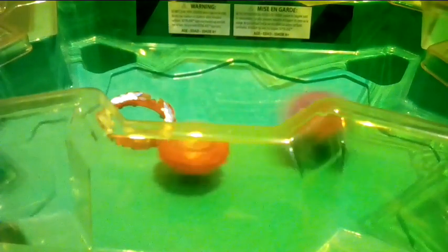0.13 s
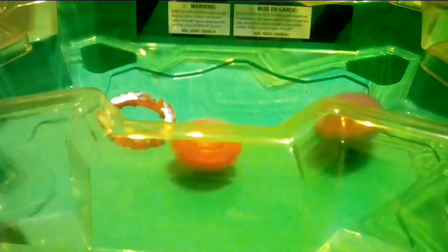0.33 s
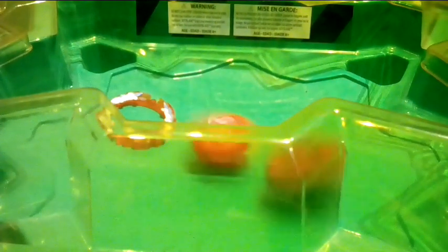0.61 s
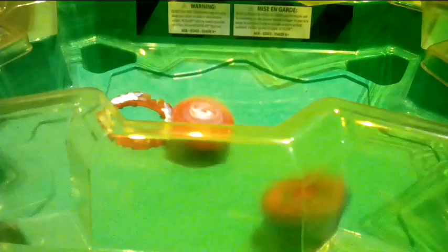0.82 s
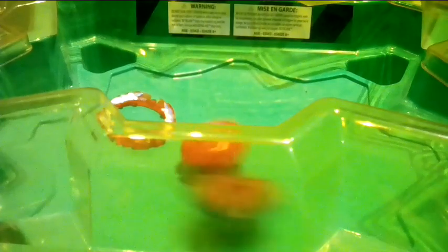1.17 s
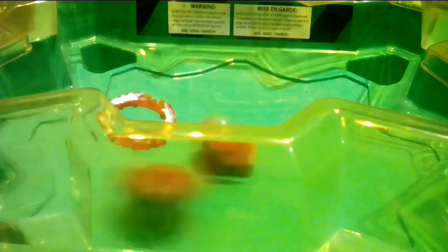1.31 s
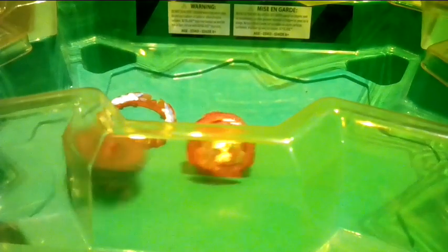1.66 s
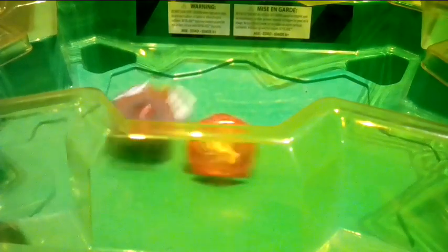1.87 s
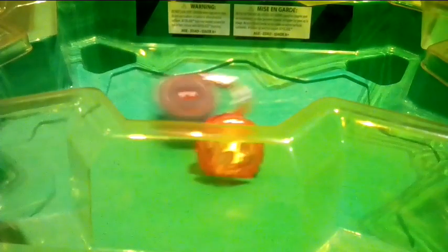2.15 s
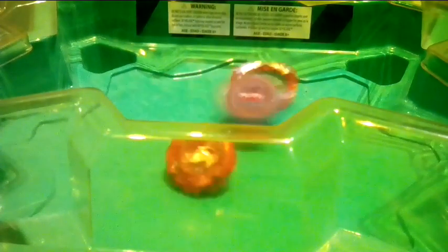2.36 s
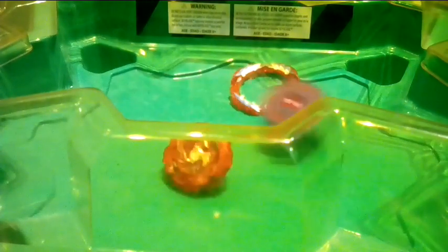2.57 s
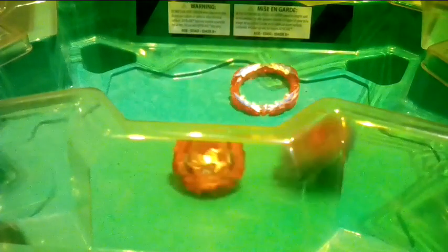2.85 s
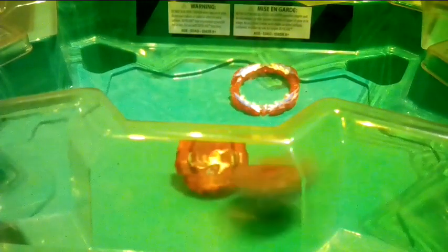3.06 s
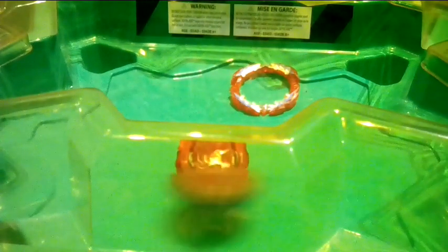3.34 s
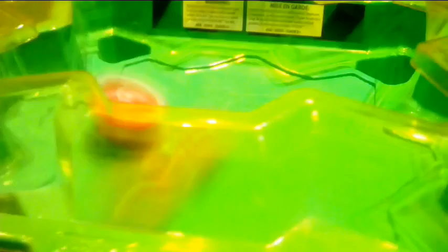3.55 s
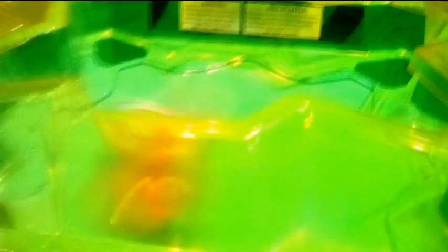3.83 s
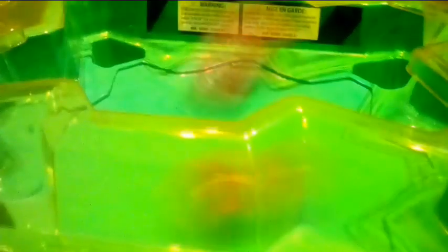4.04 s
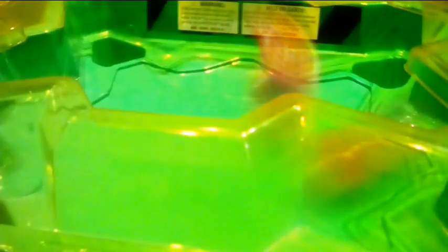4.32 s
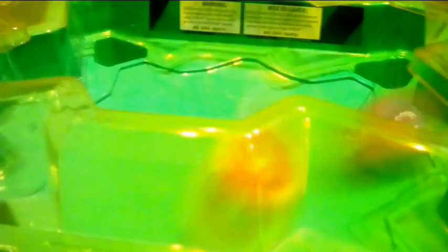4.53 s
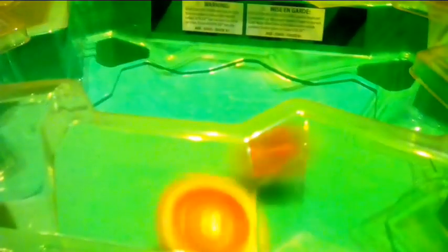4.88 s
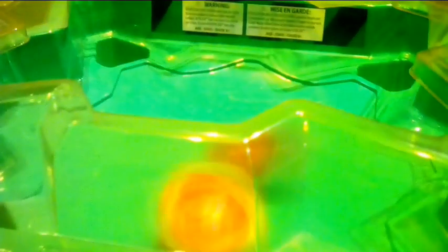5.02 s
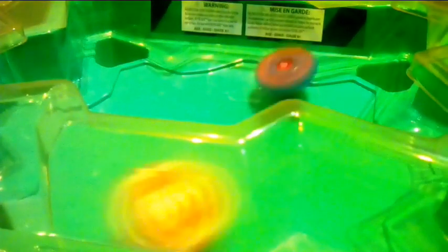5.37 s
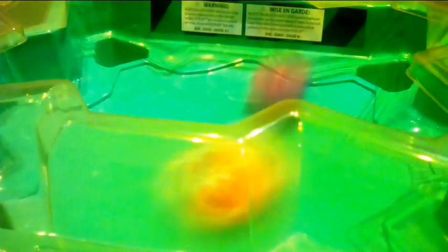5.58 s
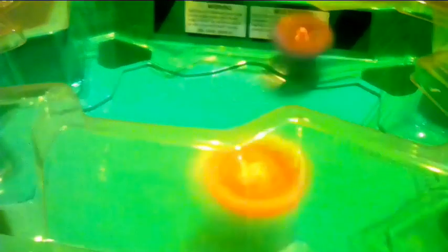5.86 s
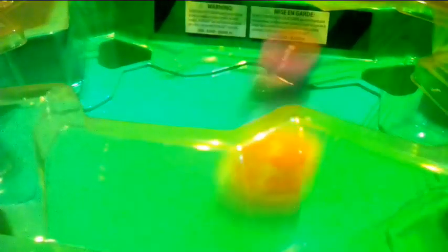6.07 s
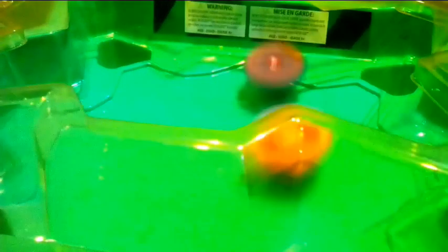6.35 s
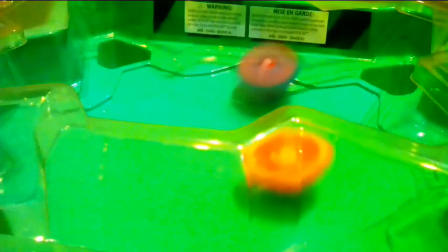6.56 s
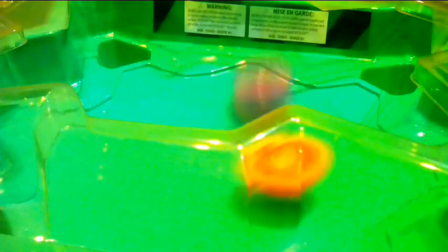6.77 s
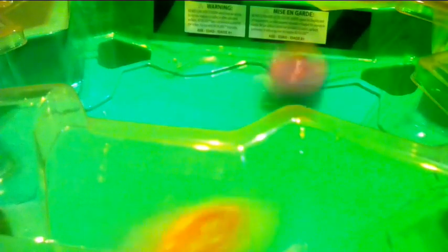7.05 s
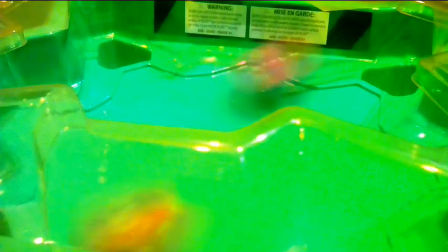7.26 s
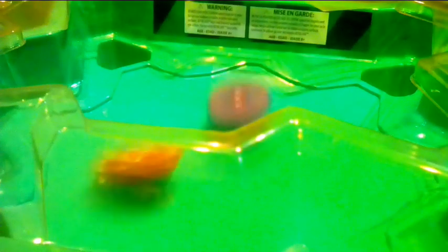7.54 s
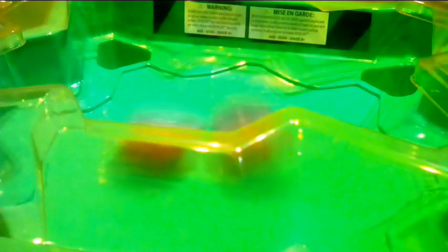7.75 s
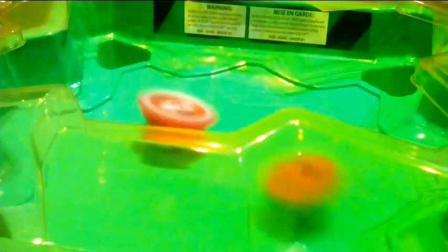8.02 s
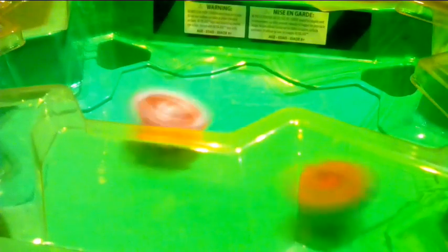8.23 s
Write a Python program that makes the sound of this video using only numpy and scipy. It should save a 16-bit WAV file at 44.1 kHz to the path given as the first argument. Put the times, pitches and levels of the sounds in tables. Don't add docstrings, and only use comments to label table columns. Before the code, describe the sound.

Two metal-rimmed tops spin in a thin hollow plastic arena, heard close in a quiet furnished room with a low hush. Light rumble and hiss open; at 0.55 s a sharp crack rings and a buzzing scrape swells, stopping at 0.8. Bright single clacks come near 1.2 and 1.8 s, then a cluster of knocks with a soft low boom around 2.0-2.3. From 2.5 to 3.3 there are only very faint quick ticks, then a small click. Sound drops out completely from 3.4 to 3.5 s. A louder, tightly doubled round starts: a heavy booming knock at 3.6, ringing crack at 3.7, and scattered knocks over rumbling tips. Dense hard slaps peak at 4.6-5.2, with more bursts at 5.5-6.1. A lull follows, with dull bumps at 6.6, a sharp clack at 6.8, and knocks around 7. Uneven soft wobbling taps continue to 8.4, with low clops near 8.2.

```python
import sys
import numpy as np
from scipy import signal
from scipy.fft import rfft, irfft
from scipy.io import wavfile
from scipy.ndimage import uniform_filter1d

SR = 44100
rng = np.random.default_rng(int(sys.argv[2]) if len(sys.argv) > 2 else 0)


def ratio_of_db(decibels):
    return 10 ** (np.asarray(decibels, float) / 20)


def bounce(signal):
    frames = np.transpose(np.atleast_2d(signal))
    limited = np.clip(frames, -1, 1)
    pcm = np.round(limited * 32767).astype(np.int16)
    wavfile.write(sys.argv[1], SR, pcm)


N = 369999
FIRST_ROUND_END_S, SECOND_ROUND_START_S = 3.408, 3.5205


def unit(x):
    return x / np.sqrt(np.mean(x ** 2) + 1e-18)


def shape(x, gain):
    return irfft(rfft(x) * gain(np.fft.rfftfreq(len(x), 1 / SR) + 1), len(x))


def colour(points):
    hz, db = np.transpose(points)
    return lambda f: ratio_of_db(np.interp(np.log(f), np.log(hz), db))


def resonances(peaks):
    def gain(f):
        total = 0
        for k, (hz, width, db) in enumerate(peaks):
            total = total + (-1) ** k * ratio_of_db(db) * 1j * f * width / (hz ** 2 - f ** 2 + 1j * f * width)
        return total
    return gain


def lowpass(f, hz, power):
    return 1 / (1 + (f / hz) ** power)


def decay(t, t60):
    return np.exp(-np.log(1000) * t / t60)


def walk(rate):
    k = int(SR / rate)
    return unit(uniform_filter1d(np.repeat(rng.standard_normal(N // k + 1), k), k)[:N])


def curve(table):
    s, *columns = np.transpose(table)
    return [np.interp(np.arange(N) / SR, s, c) for c in columns]


def add(track, s, x, db):
    i = int(s * SR)
    top = np.sqrt(uniform_filter1d(x ** 2, size=128).max())
    track[i:i + len(x)] += (x * ratio_of_db(db) / top)[:N - i]


def chatter(noise, length_s, fall_s, grain_db):
    t = np.arange(noise.shape[1]) / SR
    rise_s = 0.00023 + 0.22 * min(length_s, .012)
    hold = (1 - np.exp(-t / rise_s)) * np.exp(-np.maximum(t - length_s, 0) / fall_s)
    return noise[0] * hold * ratio_of_db(grain_db * unit(uniform_filter1d(noise[1], size=40)))


# start in seconds, chatter length in seconds, crack in dB, knock in dB.
CLASHES = [(0.551, 0.036, -28.5, -45.5), (0.578, 0.0013, -14, -27), (1.1772, 0.001, -18.5, -28.5),
           (1.785, 0.0031, -14, -29), (1.86, 0.0049, -33, -31.5), (2.162, 0.0014, -35, -35),
           (2.245, 0.0044, -16, -26.5), (3.334, 0.0017, -23, -37.5), (3.7152, 0.0029, -12.5, -20),
           (3.7208, 0.0021, -6.5, -28), (4.0475, 0.0011, -25.5, -26), (4.288, 0.0046, -24, -30),
           (4.421, 0.0014, -27, -24), (4.944, 0.013, -8, -27.5), (4.953, 0.0013, -31, -30),
           (4.986, 0.0026, -29, -24), (5.346, 0.0061, -34, -30), (5.3806, 0.0085, -26, -32),
           (5.445, .0014, -28, -27.5), (5.5375, 0.0055, -10, -24), (5.567, 0.042, -27, -29),
           (5.862, 0.0034, -25.5, -26), (5.979, 0.0017, -26, -32), (6.0688, 0.0061, -9.5, -25),
           (6.7776, 0.0054, -12, -35), (6.783, 0.0018, -14, -29)]
# start in seconds, chatter length in seconds, crack in dB, knock in dB,
# knock pitch in Hz.
KNOCKS = [(1.7984, .0057, -38.5, -27, 587), (2.187, .0027, -46, -33, 385),
          (2.2015, 0.0056, -37.5, -31.5, 380), (2.215, 0.0022, -50, -30.5, 620),
          (2.284, 0.033, -44, -28, 365), (3.6147, 0.017, -13, -4, 790), (3.746, 0.014, -35, -17, 787),
          (4.0133, 0.0052, -22.5, -9.5, 527), (4.149, 0.017, -28, -14.5, 630),
          (4.277, 0.0012, -31, -17.5, 358), (4.467, 0.011, -34, -24, 500), (4.546, 0.022, -24, -16.5, 745),
          (4.7245, 0.0054, -18.5, -10.5, 830), (4.7385, .018, -21, -12.5, 700),
          (5.1027, 0.0025, -10.5, -8, 784), (5.109, 0.0036, -13, -17, 830), (5.117, 0.0016, -14, -9, 778),
          (5.6107, 0.0057, -13, -9.5, 915), (5.6672, 0.017, -10, -9.5, 814),
          (5.7508, 0.015, -29, -15.5, 563), (5.888, 0.011, -22, -19.5, 474)]
# start in seconds, chatter length in seconds,
# crack in dB, knock in dB, knock pitch in Hz.
THUMPS = [(1.012, 0.003, -51, -42.5, 875), (1.041, 0.0026, -50, -48, 340), (1.099, 0.0016, -53, -44, 560),
          (2.003, 0.0022, -41, -33.5, 765), (2.0647, 0.0062, -43.5, -34, 364),
          (2.109, 0.0032, -34, -29, 630), (3.53, 0.01, -36.5, -21.5, 642), (3.8683, 0.034, -34, -26, 586),
          (3.958, 0.0055, -30, -13.5, 920), (3.9924, 0.0016, -25, -19.5, 700),
          (4.109, 0.006, -33.5, -30, 500), (4.3585, 0.0067, -25.5, -20.5, 756),
          (4.6447, 0.002, -13.5, -15, 893), (4.6706, 0.0013, -16, -10.5, 524),
          (4.7822, 0.003, -14.5, -13.5, 544), (4.8047, 0.002, -23, -10.5, 559),
          (5.107, 0.01, -11, -17, 1030), (5.1808, 0.0014, -5.5, -6, 747), (5.7214, 0.0014, -20, -21, 340),
          (6.0055, 0.005, -29, -29, 580), (6.94, 0.0096, -24, -18.5, 550), (7.054, 0.0025, -22, -16.5, 524),
          (7.1174, 0.018, -26, -16.5, 492), (8.013, 0.0077, -32.5, -30.5, 517)]
# start in seconds, crack in dB, crack pitch in Hz.
TICKS = [(0.42, -23.5, 7100), (.4392, -45.5, 6540), (0.4532, -36, 7140), (.4865, -40.5, 6220),
         (0.514, -35, 6240), (0.7443, -35, 5900), (0.757, -26, 7750), (0.7849, -23, 7640),
         (1.388, -40.5, 5130), (1.5994, -36.5, 8200), (1.6554, -47, 6230), (1.7543, -45.5, 6100),
         (1.773, -35, 6070), (6.775, -17.5, 6600), (4.934, -35, 6500), (7.046, -30, 6160),
         (3.577, -31, 6750), (3.613, -13.5, 4700), (4.244, -26.5, 7300), (1.612, -46.5, 6500),
         (3.975, -28, 6500)]
# start in seconds, chatter length in seconds, crack in dB,
# crack pitch in Hz, upper cap mode in Hz.
BUMPS = [
    (6.6114, 0.0067, -16, 4520, 7600),
    (6.644, 0.023, -27, 5000, 7400),
    (8.1, 0.0062, -36, 5100, 6600),
    (8.155, 0.00087, -23.5, 2800, 5120),
    (8.2875, 0.0028, -18.5, 2950, 6660),
    (8.2845, 0.00089, -26, 2920, 6700),
]
# start in seconds, crack in dB, knock in dB.
SWAYS = [(6.3236, -41, -38), (6.3674, -44, -38.5), (6.4015, -36.5, -34.5), (6.4496, -44, -34.5),
         (6.5249, -44.5, -35.5), (7.1824, -32, -39), (7.2248, -39, -34), (7.2914, -42, -29.5),
         (7.328, -34.5, -25.5), (7.379, -31.5, -27), (7.4384, -37, -31), (7.4815, -29.5, -31),
         (7.5268, -30.5, -27.5), (7.568, -44, -39), (7.6012, -36, -32), (7.6887, -34, -35),
         (7.7358, -33.5, -28), (7.8013, -34.5, -32.5), (7.8565, -36, -35.5), (7.9519, -29, -28.5),
         (8.0556, -34.5, -37), (8.1229, -34, -33.5), (8.3472, -36, -32.5)]
# start in seconds, crack in dB, knock in dB.
REBOUNDS = [(.31, -63.5, -66), (0.324, -53, -63), (1.137, -62, -56), (1.925, -51, -33), (1.942, -53, -37),
            (2.019, -52.5, -42.5), (2.128, -49, -47), (4.19, -39, -31), (4.653, -40, -24),
            (4.738, -25, -21), (4.7553, -19.5, -12.5), (4.813, -29, -18), (4.965, -27, -38),
            (4.981, -40, -26), (5.005, -32, -36), (5.024, -27, -34), (5.1215, -15, -18), (5.205, -45, -40),
            (5.225, -37, -28), (5.259, -27.5, -22.5), (5.547, -27, -20.5), (5.58, -30, -37),
            (5.661, -24, -17.5), (5.678, -24, -14), (5.687, -21.5, -12), (5.759, -17.5, -24),
            (6.084, -23, -27), (6.788, -7, -23), (6.815, -32, -37), (7.134, -23, -32), (7.246, -42, -39),
            (7.458, -41, -44), (8.178, -42, -38), (8.234, -51, -52), (7.184, -29, -48), (4.051, -29, -37),
            (6.58, -44, -42)]
RIM_CRACK_HZ, BODY_CRACK_HZ = 6420, 3120
CLASH_KNOCK_HZ, TICK_KNOCK_HZ, SWAY_KNOCK_HZ, REBOUND_KNOCK_HZ = 1030, 900, 528.5, 700
TICK_S, SWAY_S, REBOUND_S = 0.0014, 0.013, 0.00053
TICK_KNOCK_DB, BUMP_KNOCK_DB = -30, -38


def all_contacts():
    return ([(s, TICK_S, c, hz, c + TICK_KNOCK_DB, TICK_KNOCK_HZ, False) for s, c, hz in TICKS]
            + [(s, n, c, RIM_CRACK_HZ, k, CLASH_KNOCK_HZ, False) for s, n, c, k in CLASHES]
            + [(s, n, c, RIM_CRACK_HZ, k, hz, False) for s, n, c, k, hz in KNOCKS]
            + [(s, n, c, BODY_CRACK_HZ, k, hz, False) for s, n, c, k, hz in THUMPS]
            + [(s, n, c, hz, c + BUMP_KNOCK_DB, SWAY_KNOCK_HZ, upper) for s, n, c, hz, upper in BUMPS]
            + [(s, SWAY_S, c, RIM_CRACK_HZ, k, SWAY_KNOCK_HZ, False) for s, c, k in SWAYS]
            + [(s, REBOUND_S, c, RIM_CRACK_HZ, k, REBOUND_KNOCK_HZ, False) for s, c, k in REBOUNDS])


# start in seconds, chatter
# length in seconds, # crack in dB, knock in dB.
TOUCHES = [(4.6396, .001, -24, -30), (4.669, .001, -16, -28), (4.782, .001, -15.5, -28),
           (4.801, .001, -22, -28), (4.965, 0.072, -25, -39), (5.569, 0.013, -23, -34),
           (5.72, .003, -22, -32), (5.752, .004, -26, -30), (6.094, 0.049, -27, -38),
           (6.803, 0.065, -31, -38), (7.069, 0.038, -44, -28), (7.151, 0.088, -42, -31.5),
           (4.837, 0.0028, -37, -32), (4.875, .003, -37, -36), (5.32, .003, -34, -34),
           (8.189, .003, -46, -46), (8.388, .002, -36, -44), (8.013, 0.011, -40, -40),
           (7.21, .005, -36, -36), (7.652, .012, -40, -36), (7.778, .004, -42, -40),
           (7.821, .005, -35, -36), (7.896, .02, -36, -34), (3.745, .03, -26, -36), (3.79, .06, -31, -38),
           (1.19, .04, -36, -42), (0, .07, -49, -64), (5.606, .004, -30, -22), (5.5385, .004, -10, -30),
           (4.947, .008, -13, -24), (6.96, .04, -40, -25), (7.12, .015, -34, -22), (1.214, .003, -37, -42)]


def touches():
    return [(s, n, c, RIM_CRACK_HZ, k, REBOUND_KNOCK_HZ, False) for s, n, c, k in TOUCHES]


# frequency in Hz, level in dB per Hz.
CLICK_COLOUR = [(880, -42), (1500, -23.5), (3520, -8.5), (5000, -6.5), (6310, 0), (7540, -5.5),
                (9010, -12.5), (16000, -27)]
# mode in Hz, width in Hz, level in dB.
HOLLOW = [(2700, 600, 1), (3250, 450, -5), (4600, 1500, -6)]
# mode in Hz, width in Hz, level in dB.
SHELL_LOW = [(70.5, 91, -36.5), (105.6, 12.8, 4), (160, 38, -8.5), (197, 13.4, 4.5), (266, 34, -6),
             (322.4, 27, -4)]
SHELL_HIGH = [(389, 66, -2), (531, 130, -0.5), (790, 154, -2.5), (1030, 330, -6), (1243, 143, -4.5),
              (1718, 760, -22.5)]


def cap_crack(sharp, crack_hz, upper_hz):
    modes = resonances(HOLLOW + [(upper_hz, 900, 0), (11000, 5000, -24)])
    lift = resonances([(crack_hz, 1200, 0)])
    return shape(shape(sharp, modes), lambda f: (1 + .9 * lift(f)) * lowpass(f, 14000, 4) / (1 + (2100 / f) ** 6))


def rim_crack(sharp, crack_hz):
    body = [(crack_hz, 700, 8 * max(np.log2(6000 / crack_hz), 0)), (6300, 6000, -3)]
    return shape(shape(sharp, colour(CLICK_COLOUR)), resonances(body))


def contacts(rows):
    out = np.zeros(N)
    size = 8192 if rows[0][0] > SECOND_ROUND_START_S else 4096
    chance = rng.standard_normal((len(rows), 4, size))
    for (s, length_s, crack_db, crack_hz, knock_db, knock_hz, hollow), noise in zip(rows, chance):
        fall_s = 0.0037 * ratio_of_db(-0.08 * min(crack_db + 18.0, 0))
        sharp = chatter(noise, length_s, fall_s, grain_db=5.0)
        if length_s < .005:
            sharp[48] += 1.5 * np.abs(sharp).max()
        soft = chatter(noise[1:], length_s, fall_s=0.012, grain_db=3.0)
        soft[8:24] += 2.95 * np.hanning(16)
        rim_db = crack_db - knock_db

        spot = colour(list(zip(np.geomspace(1800, 15000, 12), 2.6 * noise[3, -12:])))
        crack = cap_crack(sharp, crack_hz, hollow) if hollow else rim_crack(sharp, crack_hz)
        add(out, s, shape(crack, spot), crack_db - .4)

        clack = shape(noise[2] * np.abs(sharp), resonances([(1800, 1880, 0)]))
        clack = shape(clack, lambda f: resonances([(2320, 7500, 0)])(f) * lowpass(f, 9000, 4))
        add(out, s, clack, knock_db + 0.42 * min(rim_db, 12) - 2.5)

        knock_mode = (knock_hz, 60, 5.5 - 0.15 * max(rim_db, 0))
        add(out, s, shape(soft, resonances(SHELL_HIGH + [knock_mode])), knock_db - .4)
        thud = shape(noise[3] * np.abs(soft), resonances(SHELL_LOW[2:]))
        add(out, s, thud, min(knock_db, -9) - 11.5)
    return out


# start in seconds, level in dB, pitch in Hz.
SLAPS = [(3.614, -5, 800), (3.8695, -23, 500), (3.89, -19, 505), (3.902, -21.5, 500), (3.9565, -23, 800),
         (4.6405, -13.5, 840), (4.6441, -5, 845), (4.6696, -4, 760), (4.7245, -9, 820),
         (4.7257, -13.5, 800), (4.742, -6.5, 814), (4.7422, -11, 800), (4.7557, -15, 900), (4.782, -4, 830),
         (4.8035, -7, 800), (4.813, -19, 805), (5.1025, -1, 1020), (5.1039, -5.5, 900), (5.1807, -6.5, 900),
         (5.659, -20, 815), (5.6691, -8, 860), (5.6823, -15, 700), (5.7555, -11, 550), (5.7598, -17.5, 550),
         (6.9395, -15, 700), (7.0575, -15.5, 700), (7.134, -15.5, 810)]


def slaps():
    out, blow = np.zeros(N), signal.unit_impulse(2048, idx=8)
    for s, db, hz in SLAPS:
        swing = resonances([(hz, 1.1 * hz, 0)])
        add(out, s, shape(blow, lambda f: swing(f) ** 2 / (1 + 1j * f / 9000) ** 2), db)
    return out


# start in seconds, ring in dB, lift in dB of the modes near a pitch,
# that pitch in Hz.
RINGS = [
    (-.15, -43, -14, 10700),
    (0.577, -35, 7, 10900),
    (1.176, -34.5, 12, 10000),
    (2.249, -47, 24, 12500),
    (1.787, -47, 8.5, 9420),
    (3.719, -31, 8, 10600),
    (4.953, -36, 19, 14800),
]
# mode in Hz, level in dB, decay t60 in seconds.
RIM = [(5850, -6, .12), (6120, 0, .35), (6550, -8, .2), (7600, -16, .15), (9420, -13, .16),
       (10700, -12, .22), (11380, -16, .15), (13570, -22, .2), (14830, -24, .2)]


def rims():
    out, t = np.zeros(N), np.arange(SR // 3) / SR
    chance = rng.standard_normal((len(RINGS), len(RIM), 2))
    for (s, db, lift_db, near_hz), share in zip(RINGS, chance):
        ring = np.zeros(len(t))
        for (hz, mode_db, t60), (luck, phase) in zip(RIM, share):
            near = np.exp(-(np.log2(hz / near_hz) / .17) ** 2)
            level = ratio_of_db(mode_db + 2 * luck + lift_db * near)
            flutter = 1 + np.sin(2 * np.pi * 28 * t + 3 * phase)
            ring += level * np.sin(2 * np.pi * hz * t) * flutter * decay(t - min(s, 0), t60)
        add(out, max(s, 0), ring, db)
    return out


def scrape():
    start_s, stop_s = .555, .805
    t = np.arange(N) / SR - start_s
    swell_db = -42 + 50.5 * np.clip(t, 0, 1)
    press = np.clip(t / .05, 0, 1) * ratio_of_db(swell_db) * (t < stop_s - start_s)
    buzz = rng.standard_normal(N) * ratio_of_db(3.7 * walk(340) + 1.3 * walk(90.8))
    body = resonances([(2990, 280, -4.5), (4500, 340, -0.5), (5900, 1000, -1.0), (7600, 430, 4.0),
                       (10900, 2100, -19.5)])
    return unit(shape(buzz, body)) * press


# start in seconds, length in seconds, level in dB, pitch in Hz.
SHUDDERS = [(0.579, 0.065, -40, 1030), (1.192, 0.02, -35, 900), (1.8, 0.12, -34.5, 674),
            (4.351, 0.0094, -14.5, 1080), (4.548, 0.0077, -17, 1060), (3.613, 0.014, -10.5, 545),
            (4.879, 0.0053, -20, 910), (4.99, 0.032, -30, 790), (5.135, 0.025, -23, 810),
            (5.778, 0.01, -19.5, 520), (1.199, 0.04, -37.5, 455), (5.682, 0.012, -15, 447),
            (5.753, 0.02, -7.5, 520), (6.907, 0.082, -30.5, 370), (6.783, 0.0071, -26, 1100),
            (6.951, 0.045, -26, 700), (6.96, 0.036, -23, 332), (7.137, 0.0064, -22, 537)]


def shudders():
    out = np.zeros(N)
    for (s, length_s, db, hz), noise in zip(SHUDDERS, rng.standard_normal((len(SHUDDERS), 2, 8192))):
        force = chatter(noise, length_s, fall_s=0.0065, grain_db=-3.5)
        corner = resonances([(hz, 70, 0), (hz * 1.2, 600, -10)])
        add(out, s, shape(force, lambda f: corner(f) * lowpass(f, 2000, 2)), db)
    return out


# start in seconds, level in dB, pitch in Hz, beat in Hz, decay t60 in seconds.
BOOMS = [
    (3.62, -7, 796, -1.5, 0.057),
    (3.648, -18, 785, 22.5, 0.69),
    (2.25, -26, 604, 0.5, 0.096),
    (2.283, -31, 410, 0.5, 0.13),
    (2.312, -30.5, 365, 0, .12),
    (2.245, -30, 410, 0.5, .07),
    (5.772, -14, 550, 0, .08),
    (5.1, -14, 800, 0, .08),
    (5.114, -17, 770, 0, .08),
]


def booms():
    out, t = np.zeros(N), np.arange(SR // 2) / SR
    rise_s = 0.0095
    for s, db, hz, beat_hz, t60 in BOOMS:
        pair = np.sin(2 * np.pi * hz * t)
        if beat_hz > 0:
            pair = pair - 1.06 * np.sin(2 * np.pi * (hz + beat_hz) * t)
        swell = np.sin(np.pi / 2 * np.minimum(t / rise_s, 1))
        add(out, s, pair * swell * decay(np.maximum(t - rise_s, 0), t60), db)
    return out


def lurch(steady_db, times, blows_db, fade_s):
    power, t = np.zeros(N), np.arange(SR) / SR
    np.add.at(power, (np.array(times) * SR).astype(int), ratio_of_db(2 * blows_db))
    swell = signal.fftconvolve(power, (1 - np.exp(-t / 0.0043)) * np.exp(-t / fade_s))[:N]
    return 10 * np.log10(ratio_of_db(2 * steady_db) + np.abs(swell))


def patter():
    when, size = rng.random((2, N))
    specks = (when < 260 / SR) * ratio_of_db(-2 * np.log(size + 1e-9))
    rasp = signal.lfilter([1], [1, -np.exp(-1 / (.002 * SR))], specks) * rng.standard_normal(N)
    click, body = colour(CLICK_COLOUR), resonances([(3000, 3000, -8)])
    rasp = unit(shape(rasp, lambda f: click(f) * lowpass(f, 8500, 6) + body(f)))
    return rasp * (np.arange(N) > SECOND_ROUND_START_S * SR)


# time in seconds, weight on the tray in dB, skid in dB.
RUNNING = [
    [(0, -50.5, -44.5), (.3, -65, -71), (.63, -53.5, -42), (.93, -55, -57), (1.58, -56, -58.5),
     (1.76, -55, -54.5), (1.85, -49, -52), (2.17, -52, -60), (2.6, -68.5, -71), (3.1, -58, -71.5),
     (3.4, -65, -74)],
    [(3.53, -37.5, -42), (3.8, -32, -28), (4.38, -34.5, -42.5), (4.95, -29.5, -34), (5.99, -30.5, -37),
     (6.52, -44.5, -50), (6.75, -42.5, -45.5), (6.9, -32, -28), (7.1, -33, -32), (7.2, -28.5, -45.5),
     (7.35, -34, -39.5), (8.39, -41.5, -44)],
]
# start in seconds, level in dB.
JOLTS = [(.56, -47), (1.2, -39.5), (1.82, -43), (3.49, -21), (3.87, -20), (4.28, -24), (4.55, -23),
         (5.38, -43), (5.668, -13.5), (5.891, -18), (5.981, -23), (6.91, -30), (7.051, -22.5), (7.33, -45),
         (7.96, -31.5)]


def tips():
    weight_db, skid_db = curve(np.vstack(RUNNING))
    s, _, crack_db, _, knock_db, _, _ = np.transpose(all_contacts())
    shake_s = 0.028
    shaken_db = lurch(weight_db, s, np.minimum(knock_db, -12) - 15.5, shake_s)
    rumble_db = lurch(shaken_db, *np.transpose(JOLTS), shake_s)
    drum_db = lurch(weight_db - 4, s, knock_db - 21, fade_s=0.034)
    hiss_db = lurch(skid_db, s, crack_db - 29, fade_s=0.016)
    wobble = 2.8 * walk(22)
    grains = rng.standard_normal((3, N)) * ratio_of_db(np.array([walk(250), walk(250), walk(400)]) * 2.6)

    grit_noise = rng.standard_normal(N) * ratio_of_db(3.0 * walk(300))
    grit = unit(shape(grit_noise, lambda f: resonances([(9600, 3800, 0)])(f) ** 2))
    grit = grit * ratio_of_db(hiss_db + wobble + 3.5 * walk(35) - 31)

    first_round = np.arange(N) < FIRST_ROUND_END_S * SR
    calm_modes = resonances([(96, 67, -5), (172, 32, 4.5), (260, 60, -3.5), (340, 60, -2.5)])
    calm = unit(shape(grains[0], lambda f: calm_modes(f) / (1 + (60 / f) ** 4)))
    rumble = np.where(first_round, calm, unit(shape(grains[0], resonances(SHELL_LOW))))
    rumble = rumble * ratio_of_db(rumble_db + 0.83 * walk(30) - 0.2)

    light = unit(shape(grains[1], resonances([(595, 230, -6.5), (1160, 220, -5.0), (1900, 590, -13)])))
    drum = np.where(first_round, light, unit(shape(grains[1], resonances(SHELL_HIGH))))
    drum = drum * ratio_of_db(drum_db + wobble - 1.5)
    hiss = unit(shape(grains[2], resonances([(6600, 1100, -0.5), (3200, 4200, -4), (5000, 2800, -10)])))
    hiss = hiss * ratio_of_db(hiss_db + wobble - 6.5)
    skitter = shape(drum + hiss, lambda f: lowpass(f, 9000, 6))
    return rumble + skitter + grit + patter() * ratio_of_db(hiss_db + wobble - 8)


def idling():
    out = np.zeros(N)
    start_s, stop_s, rate_hz = 2.47, 3.3, 19.5
    body = resonances([(1298, 450, -2.0), (3400, 700, -3.5), (6330, 870, -10.0)])
    for k, noise in enumerate(rng.standard_normal((16, 2, 2048))):
        s = start_s + k / rate_hz + 0.006 * noise[1, 0]
        tick = chatter(noise, 0.00385, fall_s=0.013, grain_db=8.5)
        add(out, min(s, stop_s), shape(tick, body), -65 + 3 * noise[1, 1])
    return out


# frequency in Hz, decay t60 in seconds.
ROOM = [(150, 0.71), (500, 0.6), (1500, 0.79), (4500, 0.42), (8000, 0.37), (14000, 0.24)]


def room(x):
    t, out = np.arange(SR // 2) / SR, np.zeros(N)
    spots, spot_s = 5, .07
    spot = (np.arange(N) / SR / spot_s).astype(int) % spots
    for k in range(spots):
        tail = np.zeros(len(t))
        for hz, t60 in ROOM:
            band = shape(rng.standard_normal(len(t)), lambda f: resonances([(hz, 1.15 * hz, 0)])(f) ** 2)
            tail += unit(band) * np.sqrt(hz) * decay(t, t60)
        tail = tail * np.minimum(t / 0.00065, 1)
        out += signal.fftconvolve(x * (spot == k), tail / np.sqrt(np.sum(tail ** 2)))[:N]
    return out


# frequency in Hz, level in dB per Hz.
HUSH = [(25, -37), (161, -3), (252, -6.5), (1250, -0.5), (2410, -21), (6210, -19.5), (8980, -48),
        (16000, -37.5)]


def hush():
    return unit(shape(rng.standard_normal(N), colour(HUSH))) * ratio_of_db(-63.5)


def scene():
    hits = contacts(all_contacts()) + slaps() + rims()
    grind = scrape()
    wet = ratio_of_db(-10.5) * room(hits + grind / 2)
    shell = shudders() + booms()
    return (hits + grind + wet + tips() + hush() + shell + idling() + contacts(touches()))[None]


def low_pass(x):
    return signal.sosfilt(signal.butter(12, 16430, fs=SR, output="sos"), x)


# mode in Hz, width in Hz, level in dB.
MIC_RING = [(6500, 210, -6)]


def record(dry):
    t = np.arange(N) / SR
    mic = resonances(MIC_RING)
    x = shape(dry[0], lambda f: (1 + mic(f)) / (1 + (45 / (1j * f)) ** 2 + 0.54 * 45 / (1j * f)))
    echo_db, echo_samples = -5.5, 167
    late = shape(np.roll(x, echo_samples), lambda f: ratio_of_db(echo_db) / np.sqrt(1 + (f / 9400) ** 2))
    doubled = (x + late) / np.sqrt(1 + ratio_of_db(2 * echo_db))
    x = np.where(t < FIRST_ROUND_END_S, x, 0) + np.where(t > SECOND_ROUND_START_S, doubled, 0)
    x = signal.sosfilt(signal.ellip(8, .2, 70, 15600, fs=SR, output="sos"), x)
    x = np.clip(ratio_of_db(-1.75) * x, -.95, .95)
    x = signal.sosfilt(signal.ellip(8, .2, 60, 16300, fs=SR, output="sos"), x)
    return low_pass(x[None])


dry = scene()
out = record(dry)
bounce(out)
```